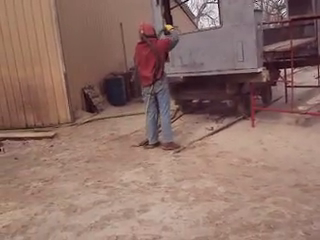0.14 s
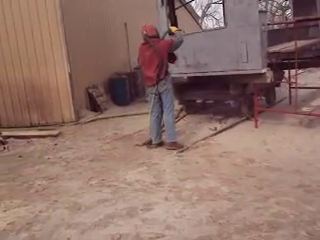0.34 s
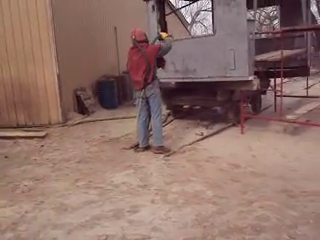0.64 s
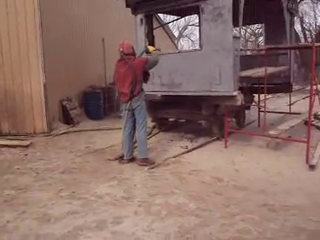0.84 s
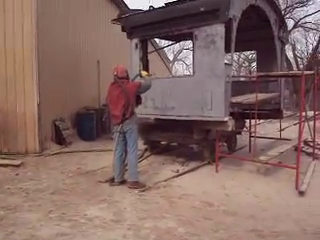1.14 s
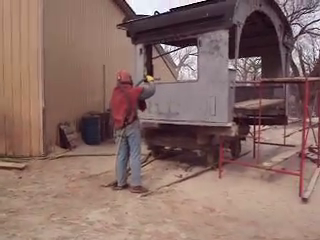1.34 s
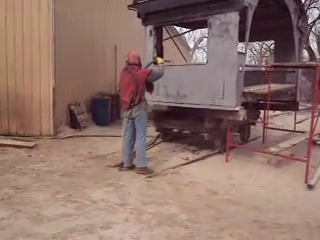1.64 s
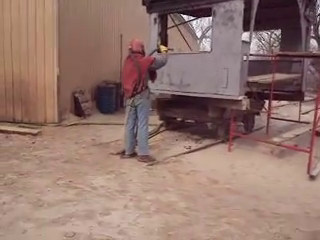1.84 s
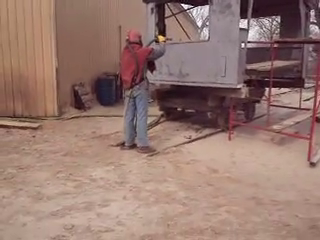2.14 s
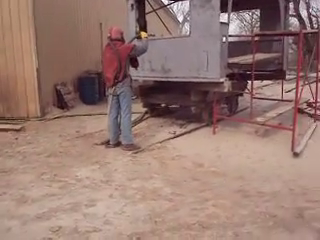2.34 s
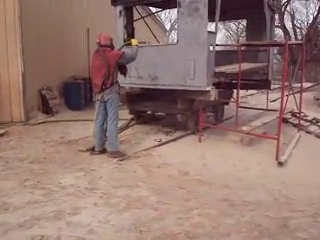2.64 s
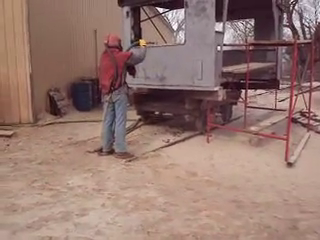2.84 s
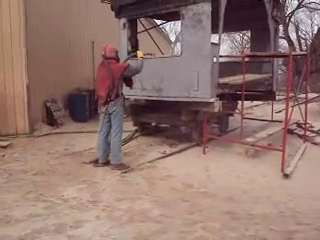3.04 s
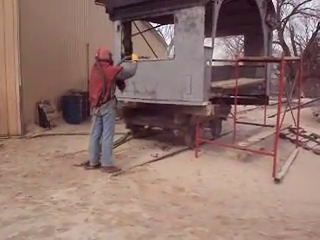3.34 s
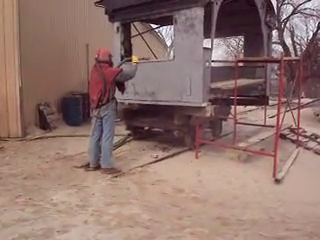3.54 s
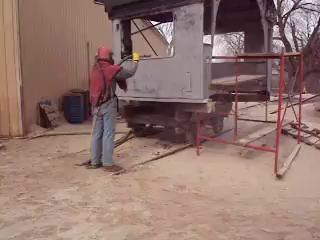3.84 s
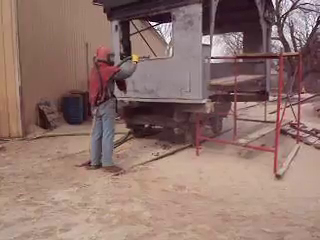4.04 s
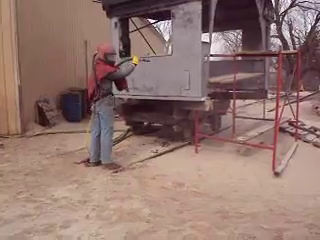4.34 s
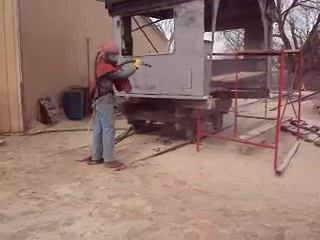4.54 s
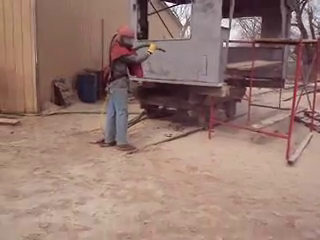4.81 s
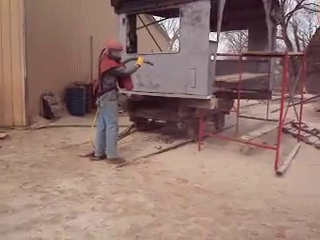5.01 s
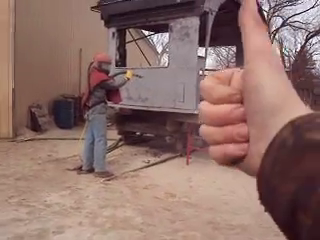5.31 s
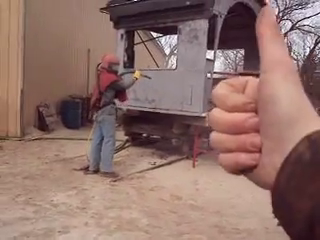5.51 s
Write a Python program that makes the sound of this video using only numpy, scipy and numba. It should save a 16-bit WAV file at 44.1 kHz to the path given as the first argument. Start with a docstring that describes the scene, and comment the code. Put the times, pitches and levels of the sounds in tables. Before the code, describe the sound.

A sandblaster sprays air and grit on a steel cab in an open yard, a few metres away. Its loud, fluttering hiss and roar run without a break, while the hollow cab booms softly about twice a second and the edges ring briefly. Toward the end the booming fades and the hiss turns louder and brighter, with a low rumble and slight crackle on the microphone.

```python
"""An open yard, where a sandblaster strips a steel cab some six metres away.
Air and grit roar and hiss on the steel. The jet rings the window frame, makes the hollow cab boom and
drums on the steel sheets; near the end it turns on to the flat side and sounds brighter. Echoes from
the ground, the steel side and the yard colour the sound. A low rumble on the microphone swells in the
loudest stretch of the blast, and the tallest spikes are cut flat and crackle."""
import sys
import numpy as np
from scipy import signal
from scipy.fft import rfft, irfft, next_fast_len
from scipy.io import wavfile
from scipy.ndimage import uniform_filter1d, map_coordinates
from numba import njit

SR = 44100
rng = np.random.default_rng(int(sys.argv[2]) if len(sys.argv) > 2 else 0)


def transcribe(u):
    """Save the signal u as a 16-bit wav file named by the first command-line argument.

    u: samples, shape (n,) or (channels, n), limited to [-1, 1]; the rate is SR.
    q: integer samples, one column per channel.
    """
    v = np.clip(np.atleast_2d(u).T, -1, 1)
    q = np.round(v * 32767).astype(np.int16)
    wavfile.write(sys.argv[1], SR, q)


N = 250047
TIME = np.arange(N) / SR

# Where the nozzle points: (time [s], way along the window frame [0-1], turn on to the flat side [0-1])
NOZZLE_AIM = [(0.0, 0.14, 0.33), (1.0, 0.1, 0.24), (2.0, 0.02, 0.01), (2.8, 0.42, 0.0), (3.7, 1, 0.08),
              (4.35, 1, 0.1), (4.78, 0.61, 0.89), (5.15, 0.73, 0.98), (5.67, 1, 1)]
# Below, "along" and "turn" are the amounts added at the end of the frame and at the full turn.

# Swells of low rumble and a tiny pop, placed where the blast is loudest:
# (time [s], level [dB], half-length [s])
RUMBLE_SWELLS = [(3.92, -32, .05), (4.338, -31.5, .07), (4.72, -36, 0.067), (4.97, -33.5, 0.098),
                 (5.3, -36.5, .22)]
POPS = [(4.8086, -3.5, 0.00048)]
# Echoes off the ground and the steel side:
# (delay [ms], strength [0-1], along [ms], along [strength], turn [ms], turn [strength])
GROUND_ECHO = (2.42, .11, .13, .07, -.29, .01)
STEEL_ECHO = (2.87, .06, .17, .03, -.17, .07)
# A hollow in the jet's sound that climbs in pitch: (time [s], centre [Hz], depth [0-1])
HOLLOW_PATH = [(0, 1480, 0.35), (.9, 1530, 0.74), (2.0, 1680, 0), (2.9, 1750, 0.47), (3.55, 1970, 0.5),
               (4.3, 2010, 0.63), (4.85, 2100, 0.33), (5.3, 2920, .24), (5.67, 3010, 0)]

# The tone colour of each noise: (frequency [Hz], relative level [dB])
RUMBLE_COLOUR = [(15, -5.5), (40, -3), (80, 2), (150, -4), (300, -13), (800, -40)]
SHEET_COLOUR = [(20, -20), (55, -11), (85, -7), (115, -4.5), (162, 2.5), (200, -4.5), (300, -10),
                (600, -22), (1500, -50)]
FINE_HISS_COLOUR = [(3500, -38), (4200, -22), (4450, -4.5), (4700, 8.5), (5000, 8), (5400, 6.5), (5700, -3),
                    (6400, -11.5), (7000, -44.5)]
HISS_COLOUR = [(900, -24), (1600, 3.5), (2000, 2.5), (2400, -7.5), (3000, 2), (3500, -1.5), (4200, 4),
               (4500, 1), (5500, -43.5)]
ROAR_COLOUR = [(60, -34.5), (150, -6), (230, -7.5), (480, -3.5), (700, -1), (1100, -6.5), (1500, -6),
               (1900, -18), (3000, -41)]

# How loud the sheets drum and the cab booms: (level [dB], along [dB], turn [dB])
DRUM_LEVEL = (-31, -1, -4)
BOOM_LEVEL = (-27.5, 4.5, -20)
# The notes of the air in the cab: (pitch [Hz], width [Hz], relative level [dB])
CAB_NOTES = [(295.4, 64, -0.5), (340.4, 49, -2.5), (377.3, 64, -1.5)]
# The nozzle crosses the window about twice a second and the boom swells: (time [s], boost [dB])
WINDOW_STROKES = [(0.0, 12.5), (0.3, 1.5), (1.03, 3.5), (1.51, 4), (1.95, 3.5), (2.47, 4.66), (2.91, 5.5),
                  (3.44, 4), (3.88, 7)]
# The jet slips off the steel: (time [s], change in the boom [dB], half-length [s])
JET_SLIPS = [(.15, -18, .07), (0.417, -12, .04)]

# How the hiss and the roar rise and fall: (time [s], level [dB])
HISS_CURVE = [(0.0, -21.5), (0.27, -22.5), (0.38, -24.0), (1.3, -23), (1.56, -20.9), (2.8, -22.5),
              (3.6, -20), (3.87, -16.5), (4.04, -19), (4.3, -15), (4.65, -17.6), (4.8, -15.5), (5.08, -18),
              (5.67, -20)]
ROAR_CURVE = [(0.0, -17.5), (0.1, -22.5), (0.3, -21.5), (0.4, -24.5), (0.58, -19.5), (0.98, -19),
              (1.28, -21.5), (1.52, -19), (2.3, -18.8), (2.72, -17.5), (2.9, -18.3), (3.53, -20.5),
              (3.68, -18.5), (4.1, -19.5), (4.3, -17.5), (4.82, -17.5), (5.1, -19.5), (5.67, -21)]
# The finest hiss and the broad hiss, on top of the hiss curve: (offset [dB], along [dB], turn [dB])
FINE_HISS_OFFSET = (-11, 1, 3)
BROAD_HISS_OFFSET = (-8.5, 1.2, -1.1)
# Brief spits of the finest hiss: (time [s], boost [dB], half-length [s])
HISS_SPITS = [(0.143, 3.09, 0.05), (5.223, 7.5, 0.028)]
# The jet catches an edge, which rings for a moment:
# (time [s], pitch [Hz], width [Hz], level against the hiss curve [dB], half-length [s])
EDGE_RINGS = [(.8, 870, 200, -5, .22), (2.7, 798, 200, -1.5, 0.073), (2.72, 4000, 180, -12.5, .36),
              (2.88, 3060, 280, -5, .33), (4.62, 2984, 394, -6.5, 0.4), (4.82, 4440, 215, -11.5, .17),
              (5.452, 3730, 321, -6, 0.19)]
# The notes of the frame's edges, and of the gap between nozzle and steel:
# (pitch [Hz], width [Hz], relative level [dB], along [octaves], along [dB], turn [octaves], turn [dB])
EDGE_NOTES = [(1960, 330, -10.5, -0.069, 3.5, 0.11, 0), (2248, 700, -7.5, 0.24, 0.5, -0.04, 0.1),
              (2958, 510, -6.5, 0.12, -0.4, 0.1, -2.5), (3580, 660, -4.64, 0.0071, -6.5, 0.062, 4.5),
              (4105, 482.0, -10.5, 0.12, -2.5, -0.04, 1.5)]
GAP_NOTES = [(824, 271, -5.5, -0.041, 3, 0.33, 0.3), (1292, 334, -6, -0.14, 3, 0.25, -1),
             (1526, 184, -15.5, -0.017, 11, 0.3, 0)]


def gain(db):
    """Turn decibels into a number to multiply by."""
    return 10 ** (np.asarray(db) / 20)


def normalise(x):
    """Scale a signal to an average size (rms) of 1."""
    return x / np.sqrt(np.mean(x ** 2))


def curves(rows):
    """Join a table's points with straight lines in time, one curve for each value column."""
    times, *columns = np.transpose(rows)
    return [np.interp(TIME, times, column) for column in columns]


def follow_aim(base, per_along, per_turn):
    """A value that follows the nozzle along the frame and through its turn."""
    along, turn = curves(NOZZLE_AIM)
    return base + per_along * along + per_turn * turn


def swell(at_s, half_s):
    """A bell-shaped rise to 1 and back; half_s from its top it stands at about 0.6."""
    return np.exp(-.5 * ((TIME - at_s) / half_s) ** 2)


def wander(rate_hz):
    """A smooth random wobble of size 1, heading for a new value rate_hz times a second."""
    hold = int(SR / rate_hz)
    steps = np.repeat(rng.standard_normal(N // hold + 1), hold)
    return normalise(uniform_filter1d(uniform_filter1d(steps, hold), hold)[:N])


def noise(colour):
    """A steady rush: random noise shaped to a tone colour."""
    hz, db = np.transpose(colour)
    size = next_fast_len(N)
    log_hz = np.log(np.fft.rfftfreq(size, 1 / SR) + 1)
    shape = gain(np.interp(log_hz, np.log(hz), db))
    return normalise(irfft(rfft(rng.standard_normal(size)) * shape, size)[:N])


@njit
def band_pass(x, hz, width_hz):
    """A filter that keeps the sound near a moving pitch."""
    out, band_state, low_state = np.empty(len(x)), 0., 0.
    for i in range(len(x)):
        tuning, damping = np.tan(np.pi * hz[i] / SR), width_hz / hz[i]
        band = (band_state + tuning * (x[i] - low_state)) / (1 + tuning * (tuning + damping))
        band_state = 2 * band - band_state
        low_state += 2 * tuning * band
        out[i] = damping * band
    return out


def blown_note(hz, width_hz):
    """Rushing air sounds a breathy note: noise filtered twice around one pitch."""
    hz = hz * np.ones(N)
    once = band_pass(rng.standard_normal(N), hz, float(width_hz))
    return normalise(band_pass(once, hz, float(width_hz)))


def aimed_note(hz, width_hz, db, along_octaves, along_db, turn_octaves, turn_db):
    """A breathy note whose pitch and loudness follow the nozzle."""
    pitch_hz = hz * 2 ** follow_aim(0, along_octaves, turn_octaves)
    return gain(follow_aim(db, along_db, turn_db)) * blown_note(pitch_hz, width_hz)


def low_rumble(floor_db=-49.5):
    """A faint low rumble on the microphone that swells at set times, with one brief pop."""
    pops = sum(gain(db) * swell(at_s, half_s) for at_s, db, half_s in POPS)
    swells = sum(gain(db) * swell(at_s, half_s) for at_s, db, half_s in RUMBLE_SWELLS)
    return (gain(floor_db) + swells) * noise(RUMBLE_COLOUR) + pops


def yard_echoes(x, count=14, echo_db=-25.5):
    """Shed wall, scaffold and wheels return weak echoes that drift as the microphone sways."""
    echoes = 0
    for delay_s in rng.uniform(.004, .024, count):
        drift_s = .00008 * wander(rate_hz=1.2)
        echoes += rng.choice([-1, 1]) * np.interp(TIME - delay_s - drift_s, TIME, x, left=0)
    return gain(echo_db) * echoes


def near_echo(x, path):
    """A quick bounce that shifts with the nozzle; added to the jet it lifts some pitches, dulls others."""
    delay_ms, strength = follow_aim(*path[::2]), follow_aim(*path[1::2])
    return strength * map_coordinates(x, [np.arange(N) - delay_ms * SR / 1000], order=3)


def frame_hollow(x, width_hz=230.):
    """Sound paths around the edge of the frame cancel each other in one moving band."""
    hz, depth = curves(HOLLOW_PATH)
    return x - depth * band_pass(x, hz, width_hz)


def sheet_drum(slip_db):
    """The big steel sheets drum under the jet; a slip quietens them less than it does the cab."""
    return gain(follow_aim(*DRUM_LEVEL) + .7 * slip_db) * noise(SHEET_COLOUR)


def cab_boom(slip_db, stroke_half_s=.044):
    """The air in the cab booms at each stroke and dies away once the jet leaves the window."""
    stroke_db = sum(db * swell(at_s, stroke_half_s) for at_s, db in WINDOW_STROKES)
    boom = normalise(sum(gain(db) * blown_note(hz, width) for hz, width, db in CAB_NOTES))
    return gain(follow_aim(*BOOM_LEVEL) + slip_db + stroke_db) * boom


def edge_song():
    """The jet splits on the frame's edges and sings in broad, high bands, with brief narrower rings."""
    rings = sum(gain(db) * swell(at_s, half_s) * blown_note(hz, width)
                for at_s, hz, width, db, half_s in EDGE_RINGS)
    return sum(aimed_note(*note) for note in EDGE_NOTES) + rings


def jet_hiss():
    """The high part of the jet: a broad hiss, the singing edges and a finer hiss that spits."""
    broad = gain(follow_aim(*BROAD_HISS_OFFSET)) * noise(HISS_COLOUR)
    edges = edge_song()
    spit_db = sum(db * swell(at_s, half_s) for at_s, db, half_s in HISS_SPITS)
    fine = gain(follow_aim(*FINE_HISS_OFFSET) + spit_db) * noise(FINE_HISS_COLOUR)
    return gain(curves(HISS_CURVE)[0]) * (broad + edges + fine)


def jet_roar():
    """Air and grit roar on the steel, and the gap between nozzle and steel rings at three pitches."""
    rush = gain(-3) * noise(ROAR_COLOUR)
    gap = gain(.32) * sum(aimed_note(*note) for note in GAP_NOTES)
    return gain(curves(ROAR_CURVE)[0]) * (rush + gap)


def sandblaster():
    """Roar, hiss, boom and drum all flutter together, because the grit feeds unevenly."""
    roar, hiss = jet_roar(), jet_hiss()
    slip_db = sum(db * swell(at_s, half_s) for at_s, db, half_s in JET_SLIPS)
    boom, drum = cab_boom(slip_db), sheet_drum(slip_db)
    flutter = gain(.11 * wander(rate_hz=21.8))
    flicker = gain(.3 * wander(rate_hz=45))  # the hiss wavers a little more
    return flutter * (roar + flicker * hiss + boom + drum)


def rasp(x, lean=.54, steepen=.18, ceiling=.81):
    """The loud blast is lopsided: its downward swings sharpen into spikes, its upward ones flatten."""
    bent = x - lean * x ** 2 + steepen * x ** 3
    rounded = bent / (1 + (bent / ceiling) ** 8) ** (1 / 8)  # the microphone softens tall spikes
    low_cut = signal.butter(2, 90, "high", fs=SR, output="sos")
    return signal.sosfiltfilt(low_cut, rounded)


def scene():
    """The sandblaster with its echoes, and the low rumble, in one channel."""
    blast = frame_hollow(sandblaster())
    echoes = near_echo(blast, GROUND_ECHO) + near_echo(blast, STEEL_ECHO) + yard_echoes(blast)
    return (rasp(gain(-.53) * (blast + echoes)) + low_rumble())[None]


def record(dry, band_hz=5910, limit=.725, crackle_top_hz=15900):
    """The microphone loses the highest treble; the tallest spikes are then cut flat and crackle."""
    treble_cut = signal.firwin(171, band_hz, fs=SR)
    narrow = signal.fftconvolve(dry, treble_cut[None], mode="same")
    flattened = np.clip(narrow, -limit, limit)
    crackle_filter = signal.ellip(8, .2, 70, crackle_top_hz, fs=SR, output="sos")
    return signal.sosfilt(crackle_filter, flattened)


dry = scene()
out = record(dry)
transcribe(out)
```